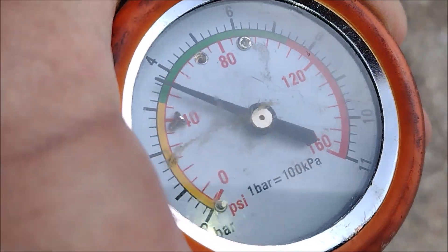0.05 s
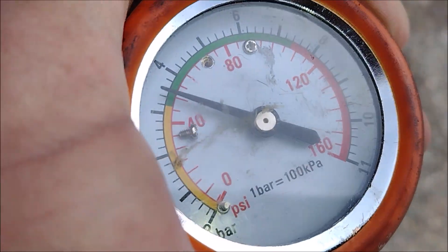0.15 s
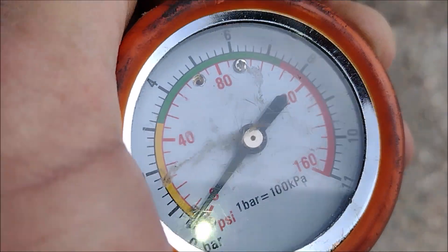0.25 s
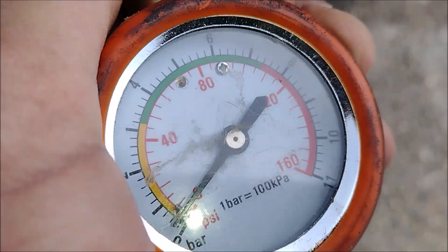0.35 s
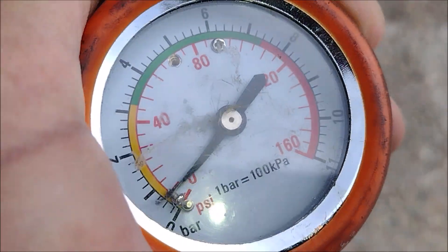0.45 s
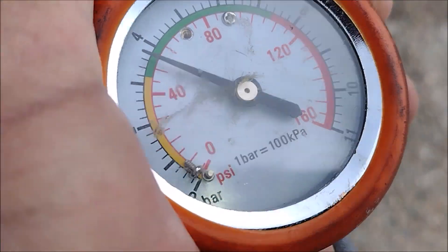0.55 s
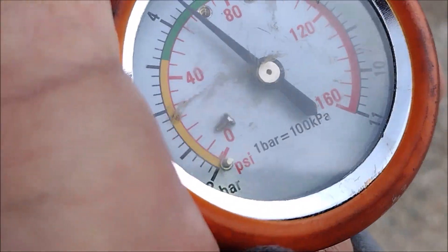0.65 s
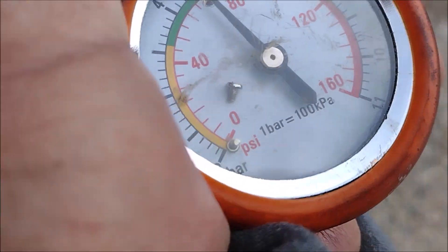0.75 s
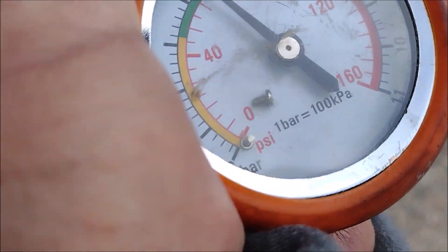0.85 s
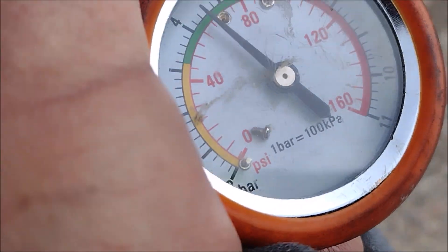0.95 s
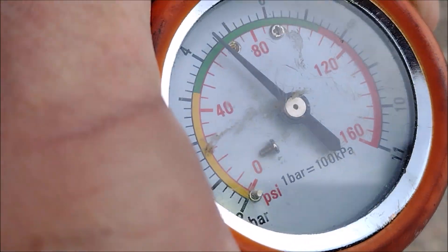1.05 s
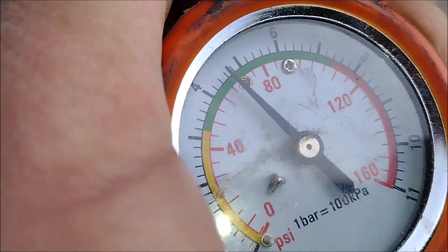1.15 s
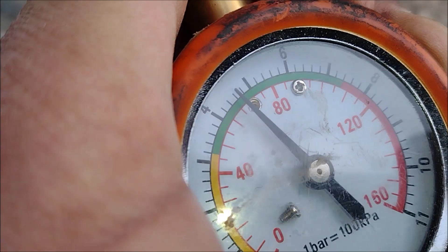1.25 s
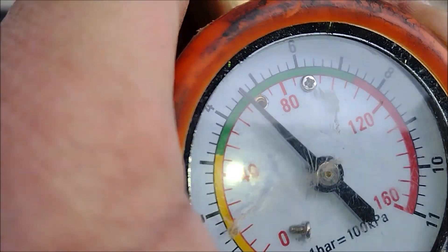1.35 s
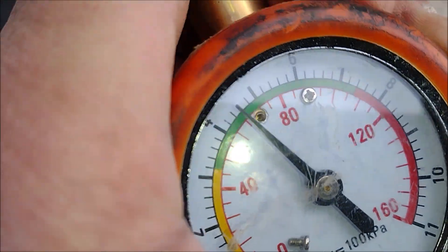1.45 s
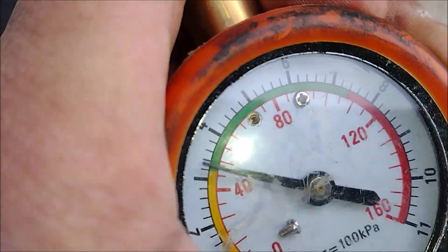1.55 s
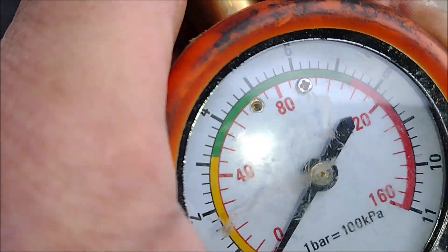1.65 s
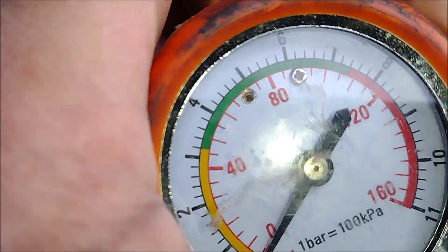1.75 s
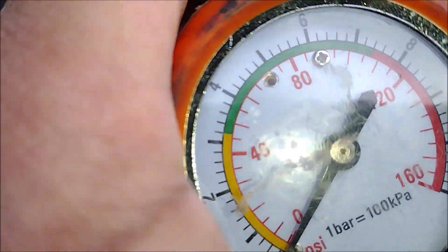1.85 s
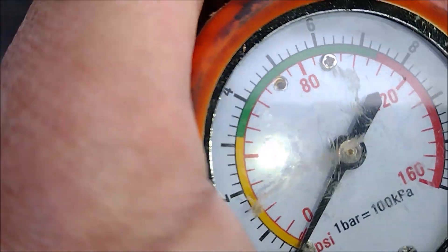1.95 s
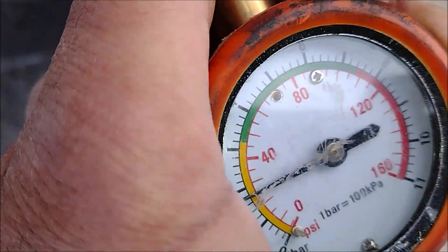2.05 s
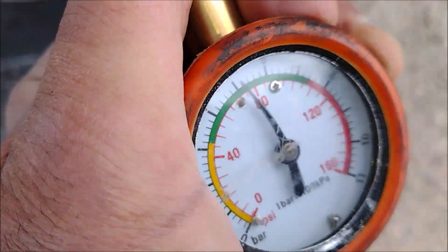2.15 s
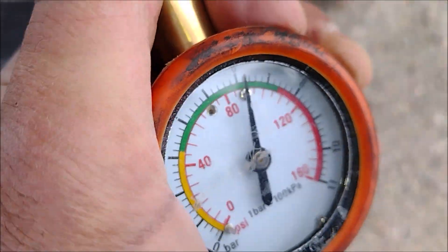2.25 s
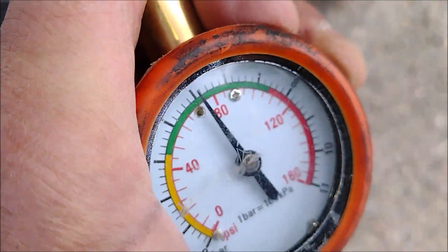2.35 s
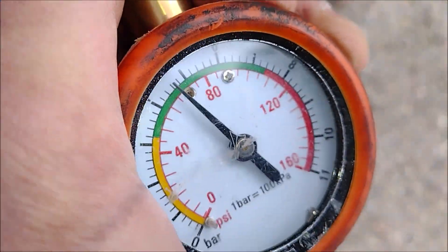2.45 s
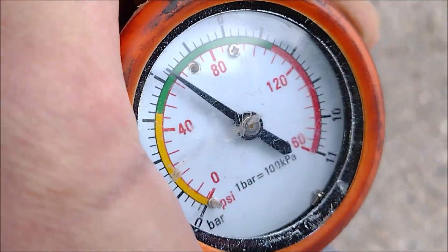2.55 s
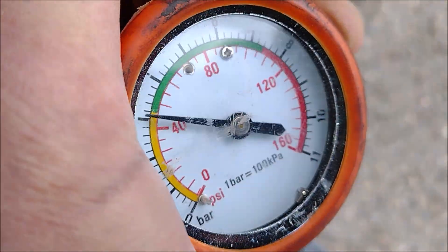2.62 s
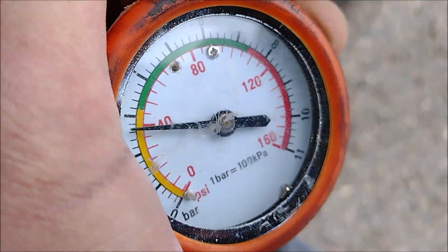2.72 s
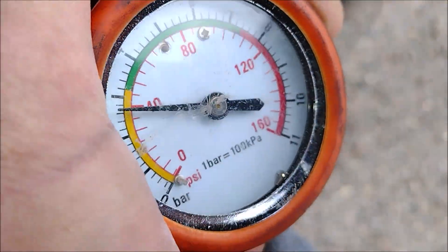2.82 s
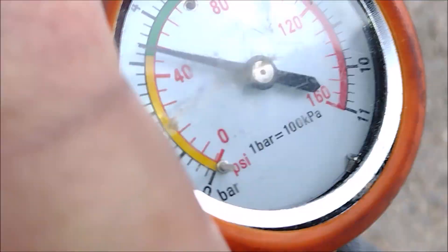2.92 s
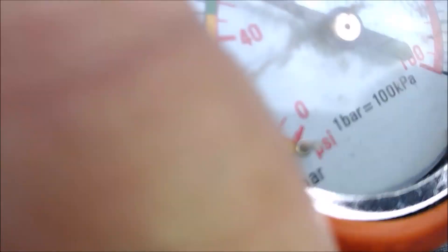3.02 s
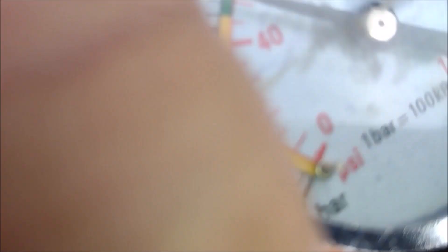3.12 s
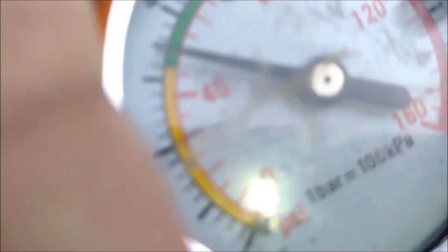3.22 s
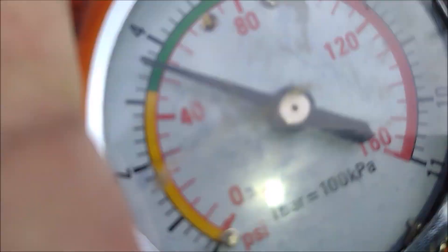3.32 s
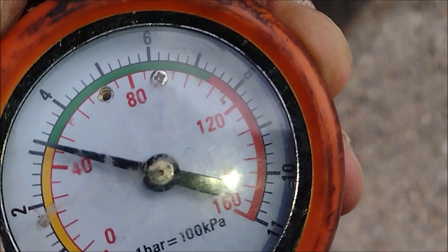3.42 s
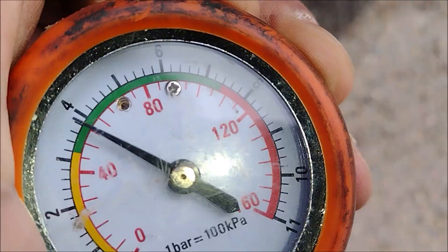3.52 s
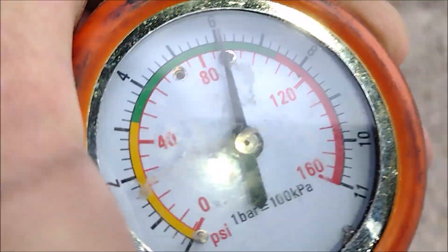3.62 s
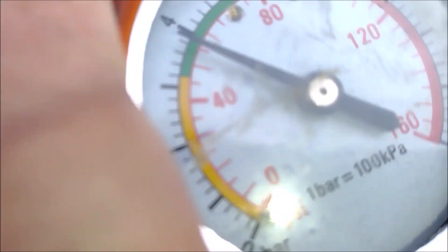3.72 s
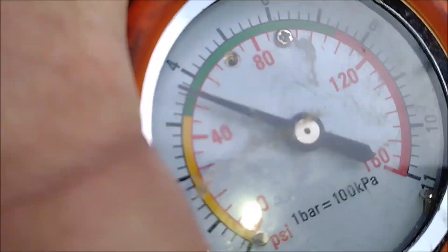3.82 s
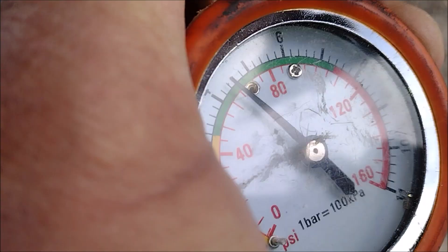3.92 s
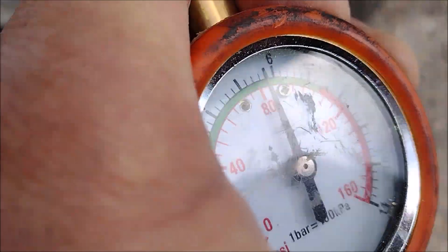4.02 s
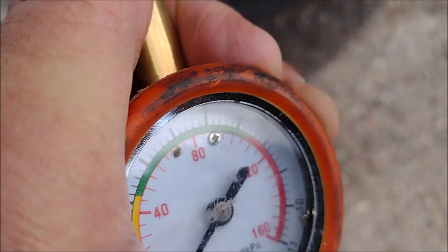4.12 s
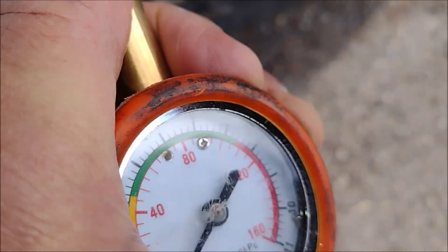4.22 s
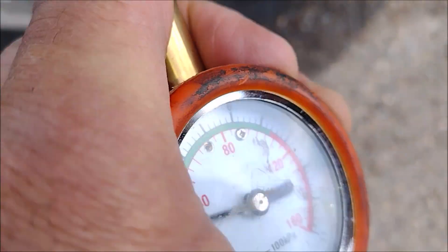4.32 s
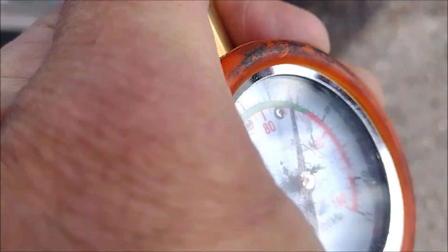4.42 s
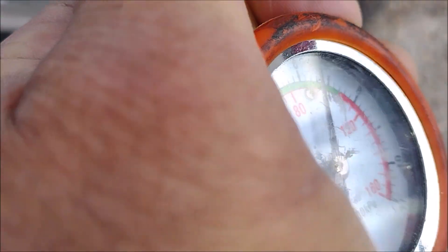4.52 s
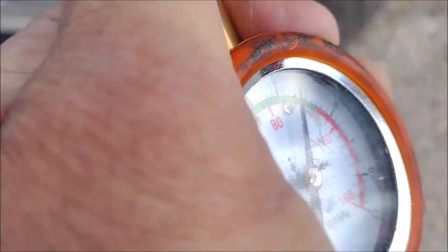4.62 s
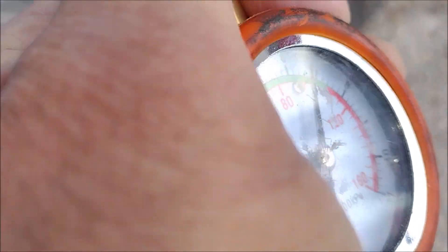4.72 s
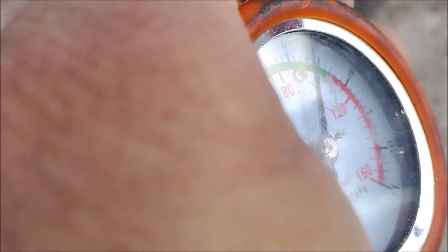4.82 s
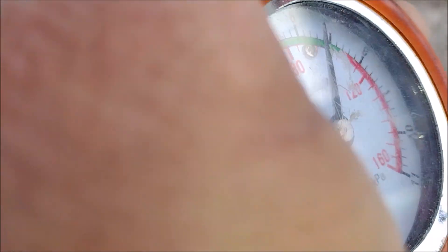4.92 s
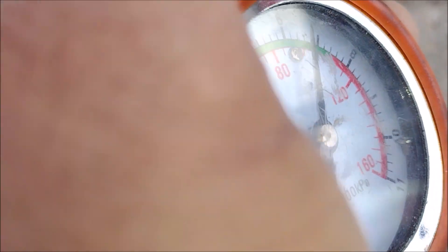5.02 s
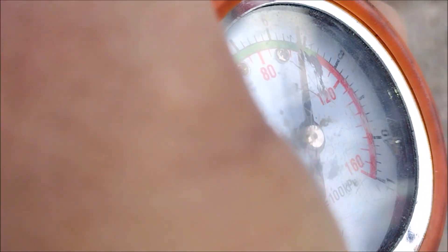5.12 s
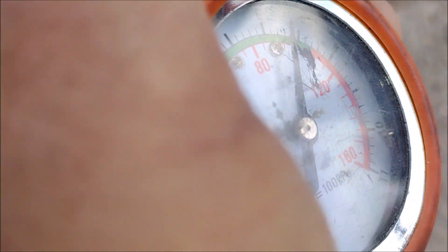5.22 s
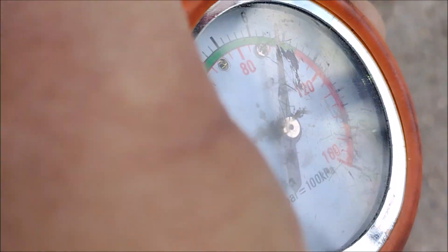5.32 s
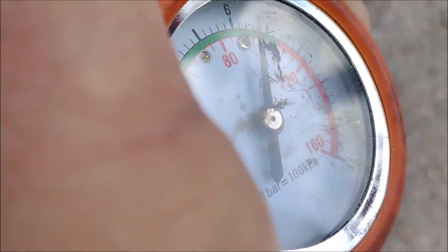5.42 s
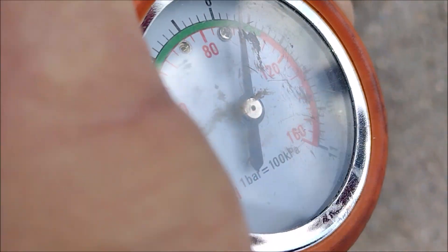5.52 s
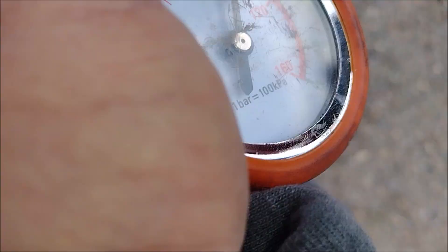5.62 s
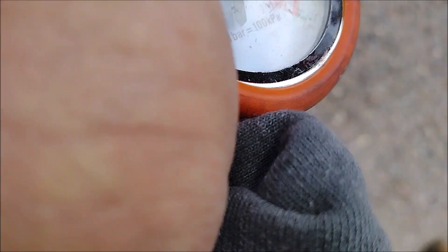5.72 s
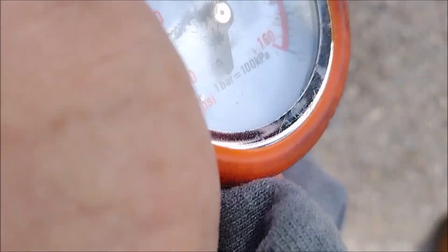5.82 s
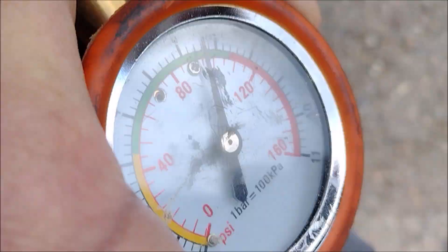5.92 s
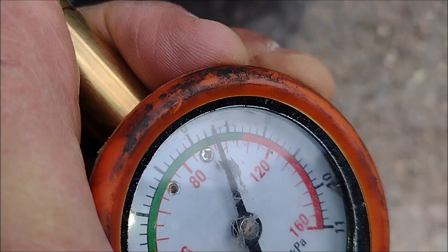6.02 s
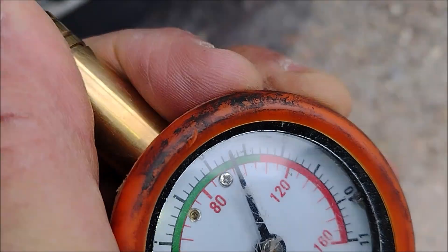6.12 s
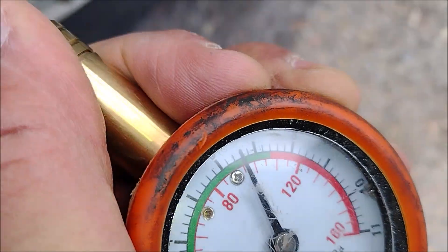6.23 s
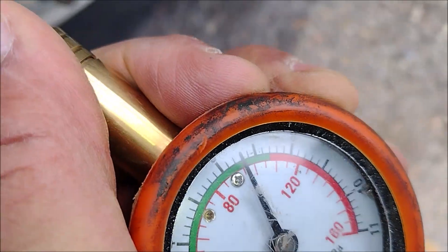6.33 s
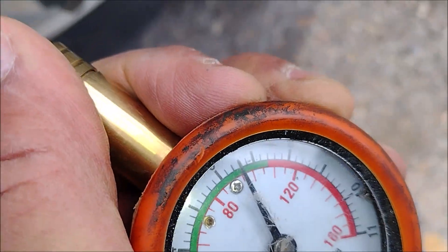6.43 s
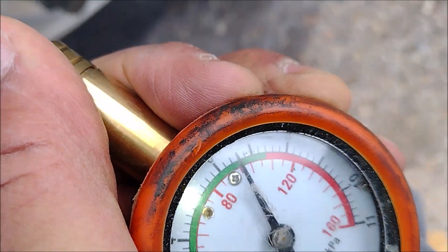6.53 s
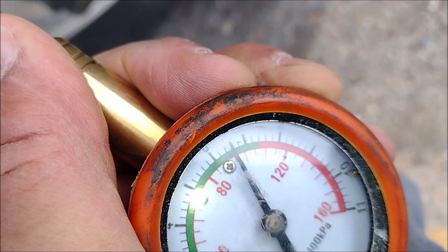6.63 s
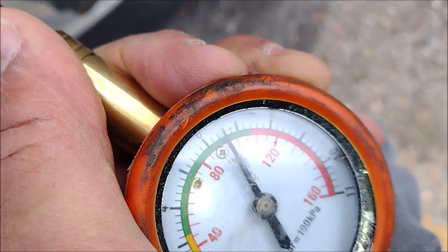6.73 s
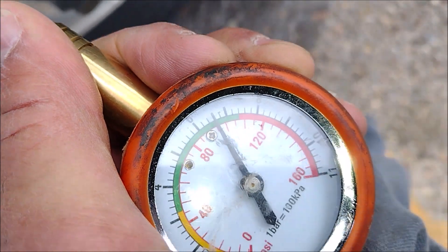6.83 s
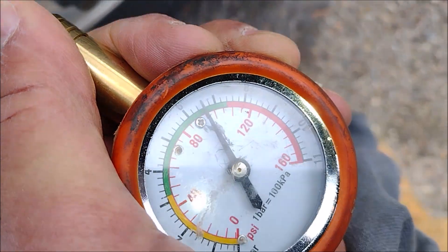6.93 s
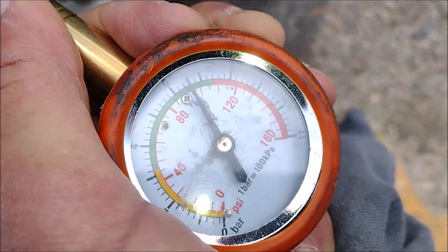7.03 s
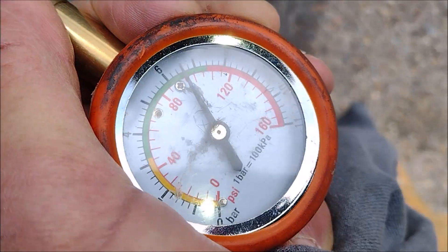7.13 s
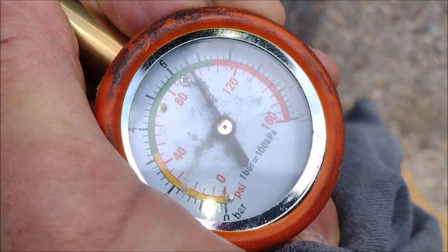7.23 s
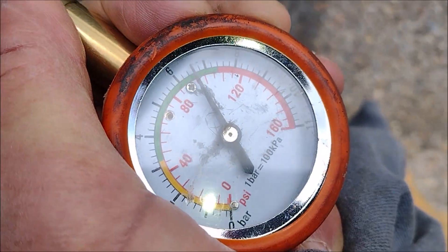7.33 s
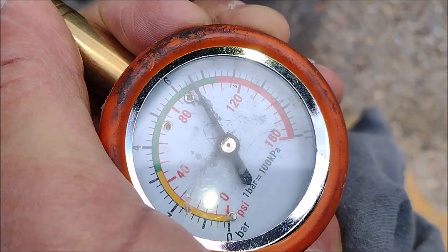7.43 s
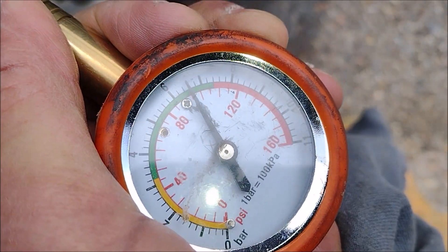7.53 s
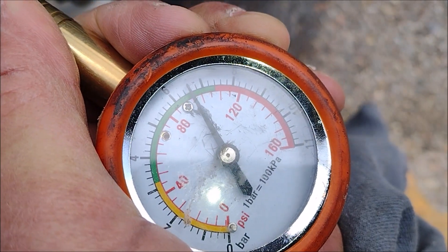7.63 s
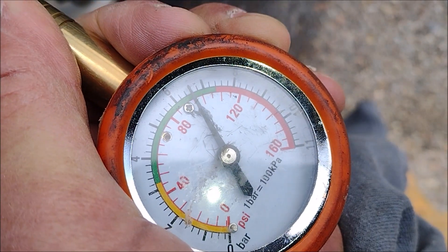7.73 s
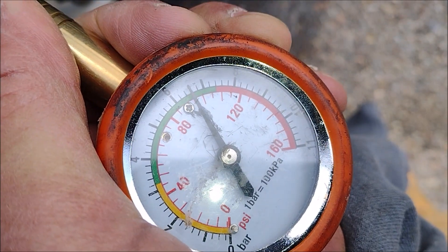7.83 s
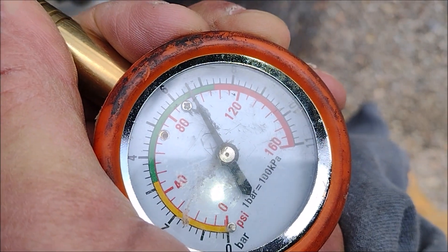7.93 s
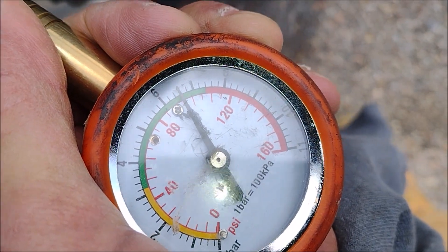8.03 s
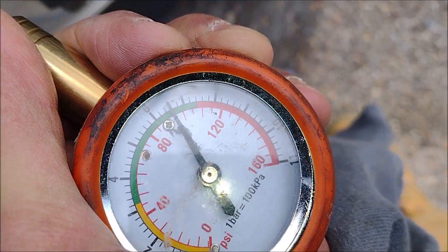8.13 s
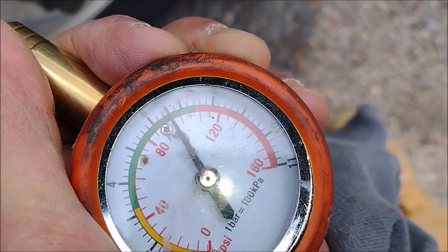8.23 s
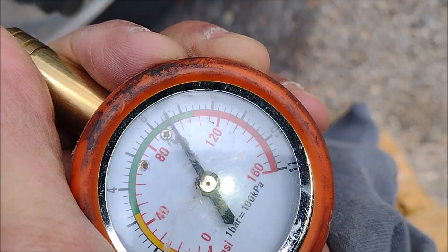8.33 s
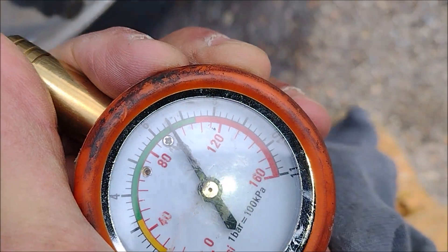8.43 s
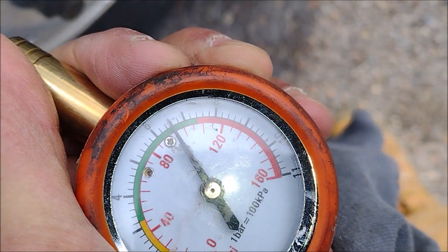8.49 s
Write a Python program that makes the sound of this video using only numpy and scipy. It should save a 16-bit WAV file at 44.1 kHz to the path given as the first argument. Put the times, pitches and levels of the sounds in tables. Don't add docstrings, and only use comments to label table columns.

```python
import sys
import numpy as np
from scipy import signal
from scipy.fft import rfft, irfft, next_fast_len
from scipy.io import wavfile
from scipy.ndimage import uniform_filter1d, map_coordinates

SR = 44100
rng = np.random.default_rng(int(sys.argv[2]) if len(sys.argv) > 2 else 0)


def master_out(mix):
    frames = np.transpose(np.atleast_2d(mix))
    ceiling = np.clip(frames, -1, 1)
    pcm = np.round(ceiling * 32767).astype(np.int16)
    wavfile.write(sys.argv[1], SR, pcm)


def invert_db(x):
    u = np.asarray(x, float) / 20
    return 10 ** u


N = 377496

# opening in seconds, shutting in seconds,
# jet level in dB, growth of the rasp in dB, closing rate in dB per second.
BURSTS = [
    (-0.3, 0.383, -22.5, -6, 1104),
    (0.588, 1.698, -22, 7, 953),
    (2.114, 4.232, -22, 0.5, 800),
    (4.365, 4.481, -23, 6, 902),
]
# start in seconds, length in seconds, flow in dB, gap in dB.
ROCKS = [(-0.1, 0.22, 0.6, 2), (0.15, 0.2, 0.5, -3), (0.677, 0.12, -1, 3), (0.818, 0.092, -1.2, 5),
         (0.986, 0.14, 0, 0), (1.106, 0.25, -1, 3), (1.44, 0.51, -1.5, 3.0), (2.139, 0.031, 0, 5),
         (2.17, 0.07, 3.5, 1), (2.249, 0.068, 0, -13), (2.316, 0.057, 1, -7.5), (2.377, 0.41, 1, 2.0),
         (2.795, 0.32, 1.5, 3.5), (3.15, 0.36, 1, -3.5), (3.61, 0.12, 1.5, 3.5), (3.703, 0.067, -2.5, -2.5),
         (3.778, 0.029, 1, 3), (3.826, 0.13, -1.5, -1.5), (3.978, 0.11, 2.5, 0), (4.067, 0.16, -1, 2),
         (4.208, 0.026, 3, 1.5), (4.406, 0.064, 2.5, 4)]
# frequency in Hz, density in dB per Hz.
BLAST_COLOUR = [(150, -27), (250, -14), (360, -16.5), (517, -3), (855, -8.5), (933, -4), (1460, -8),
                (1770, -8), (2000, -8.5), (2500, -8.5), (2980, -8.5), (5550, -9), (7080, -6), (10000, -12),
                (15700, -7)]
# frequency in Hz, left minus right in dB.
BLAST_BALANCE = [(60, -5.5), (99, -6.5), (160, -5), (270, -6), (450, -1.5), (740, -6.5), (1220, -5.5),
                 (2010, -11), (3330, -1), (5500, -3.5), (9080, 1), (15000, 9.5)]
# frequency in Hz, width in Hz, level in dB.
HOSE_MODES = [(516, 31, 5), (663, 55, 7), (960, 26, 7.5), (1300, 62, 4), (1460, 105, 5.5), (1988, 14, 3),
              (2036, 130, 3), (2810, 130, 2), (3950, 73, -7)]
# delay in ms, left share, right share.
NEAR_ECHOES = [(1.2, 0.12, -0.068), (1.9, 0.13, -0.051), (2.55, 0.17, 0.067), (3.55, -0.1, 0.16),
               (4.3, 0.042, 0.013), (6.1, -0.047, -0.12)]
# time in seconds, hiss level in dB, turn of the hand from 0 to 1.
LEAK_FLOW = [(4.48, -36.5, 0.07), (4.62, -23.5, 0.18), (4.66, -30.5, 0.06), (4.76, -26, 0.18),
             (4.9, -25, 0.31), (5.02, -29, 0.14), (5.66, -34, 0.36), (5.77, -34, 0.41), (5.87, -38, 0.33),
             (6.12, -31.5, 0.59), (6.49, -32, 0.69), (6.71, -35, 0.86), (7.12, -38, 0.83), (7.3, -33.5, 1),
             (7.65, -32.5, 0.99), (8.42, -32, 0.78), (8.56, -30.5, 0.94)]
# frequency in Hz, density in dB per Hz.
LEAK_COLOUR = [(500, -30.5), (1400, -25), (2400, -15.5), (2950, -6), (3550, -18), (4800, -17.5),
               (5900, -11.5), (6500, -2.5), (7300, -3), (8100, -4.5), (8800, -14), (11000, -19),
               (13500, -15.5), (15700, -5.5)]
# frequency in Hz, left minus right in dB.
LEAK_BALANCE = [(500, 19.5), (1500, -7), (2900, 9), (3800, 3.5), (4800, -2.5), (6000, 6.5), (7300, 13.5),
                (8800, 14.5), (10000, 21), (11500, 32), (13000, 37.5), (15500, 19.5)]
# time in seconds, extra path in ms.
GLINT = [(4.5, .945), (5.12, .99), (5.45, .99), (5.95, .95), (6.15, .91), (6.4, .88), (7.0, .87),
         (7.3, .886), (8.56, .888)]
# time in seconds, peak in dB, brightness in dB per octave.
TICKS = [
    (1.773, -42, 7),
    (1.776, -54, 13),
    (1.82, -42, -5.5),
]
# frequency in Hz, level in dB, 60 dB decay time in seconds.
CHUCK_MODES = [(2920, -7, 0.15), (4915, 0.5, 0.098), (5800, 7, 0.028), (7763, -5, .05), (9800, 1, .025),
               (13600, -6, .05)]
# frequency in Hz, likeness from 0 to 1.
LIKENESS = [(200, 0.63), (600, 1), (1500, 0.35), (3000, 0.7), (6000, 0.19), (12000, 0.11)]
# time in seconds, peak in dB, length in seconds.
GUSTS = [(0.033, -38, 0.013), (0.18, -23, .1), (0.368, -27, 0.034), (0.525, -22.5, 0.037),
         (1.996, -31, 0.013), (0.91, -40.5, .08), (1.13, -28, 0.029), (1.24, -31.5, 0.064),
         (1.805, -30.5, 0.071), (1.995, -26, 0.048), (2.084, -23.5, 0.039), (2.154, -22.5, 0.072),
         (2.434, -33, .06), (2.76, -32.5, 0.064), (3.045, -34, 0.076), (3.135, -25, .03),
         (3.213, -29, 0.037), (3.342, -28.5, 0.16), (3.613, -24.5, 0.033), (3.836, -27, 0.033),
         (3.904, -27, 0.037), (4.016, -27.5, 0.052), (4.236, -24.5, 0.063), (4.37, -31, 0.087),
         (5.042, -36.5, 0.046), (6.078, -46.5, 0.16), (0.566, -29.5, .02), (7.847, -47, 0.025),
         (7.93, -39, 0.021), (8.1, -47, 0.045)]
# time in seconds, change in dB, length in seconds.
LULLS = [
    (0.083, -19, 0.04),
    (0.446, 3, 0.03),
    (2.33, -4, 0.044),
    (3.718, -4, 0.041),
    (4.5, -4, 0.028),
]
# frequency in Hz, density in dB per Hz.
BUFFET_COLOUR = [(15, -53), (25, -38), (84, 0), (118, 0.5), (266, -11), (328, -18), (362, -20),
                 (750, -34.5), (1000, -39), (1200, -61), (1560, -75), (2640, -120)]
# frequency in Hz, density in dB per Hz.
YARD_COLOUR = [(15, -62), (25, -35), (48, -28), (59, -5), (81, -0.5), (157, 0.5), (298, -12), (429, -18.5),
               (482, -16), (1300, -27.5), (1690, -55), (2860, -120)]

CREEP_DB, CREEP_DB_PER_S, CREEP_THIN_DB = -43.5, 700, -1
OPEN_S, OPEN_POWER = 0.0083, 2.2
BUILD_DB, BUILD_S = -5.5, 0.064
SQUEEZE_DB, SQUEEZE_S = 2.5, 0.056
POP_DB, POP_S = 9.0, 0.03
PAUSE_DB, PAUSE_ROAR_DB, PAUSE_FADE_DB_PER_S = -69, 18.5, 15
ROCK_EDGE_S = 0.0092
ROAR_DB, RASP_DB, TOP_DB = -4.5, -5.5, -7.5
RASP_PER_GAP, TOP_PER_FLOW = 0.39, -1.18
SEALED_JET_DB, SEALED_GAP_DB = -27, -16
BOOM_FOLLOWS = 0.83
LOOSE_LEAD_MS = 0.2783

WHISTLE_DB, SIZZLE_DB, AIR_DB = (-7, -18), (4.5, -11), (-8, -7)
SHADE_DB, LEAD_MS = (5, 25.5), (0.21, 0.36)
WHISTLE_HZ, WHISTLE_OCTAVES, WHISTLE_STANDS_DB = 2800, 0.14, 8
COVER_S, COVER_WIDTH_S, COVER_DB = 5.7, 0.58, -10.5
GLINT_SHARE = 0.38
TYRE_HUM_HZ, TYRE_HUM_WIDTH_HZ, TYRE_HUM_DB = 610, 73, (3, 15)

GUST_FALL_DB = 5.5
DRAUGHT_DB, YARD_DB = -43.0, -43


def blast():
    def bend(hz, t):
        _, roar_db, rasp_db, top_db = chuck(t)
        over_roar = share_of(hz, 1440, 3950)
        follows = BOOM_FOLLOWS + (1 - BOOM_FOLLOWS) * share_of(hz, 630, 1100)
        under_jet = (roar_db + 0.5) * follows * (1 - over_roar) + (rasp_db + 5) * over_roar
        return under_jet * (1 - share_of(hz, 3650, 5300)) + (top_db + 1) * share_of(hz, 8000, 9080)

    air = turbulence(BLAST_COLOUR, BLAST_BALANCE, (4500, 8300), bend,
                     gust_db=-0.11, patch_db=1.2, streak_db=1.83)
    rung = air.copy()
    for hz, width_hz, db in HOSE_MODES:
        rung += (invert_db(db) - 1) * resonance(air, hz, width_hz)

    t = np.arange(N) / SR
    jet_db = np.interp(t, t[::32], chuck(t[::32])[0])
    sealing_db = -90 * np.clip((t - 4.52) / 1.1, 0, 1)
    rung = rung * invert_db(jet_db + sealing_db - 1.0)

    near = rung + invert_db(-4) * resonance(rung, 2940, 8.4)
    for ms, *shares in NEAR_ECHOES:
        lag = round(ms * SR / 1000)
        near[:, lag:] += np.array(shares)[:, None] * rung[:, :-lag]
    return near


def chuck(t):
    jet_db, roar_db, rasp_db = 0 * t - 120, 0 * t, 0 * t
    for start, stop, db, grow_db, shut_db in BURSTS:
        age, left = np.maximum(t - start, 0), stop - t
        level_db = db + (CREEP_DB - db) * np.exp(-(age / OPEN_S) ** OPEN_POWER)
        level_db = level_db + CREEP_DB_PER_S * np.minimum(t - start, 0)
        level_db = level_db + BUILD_DB * np.exp(-age / BUILD_S)
        level_db = level_db + SQUEEZE_DB * np.exp(-np.abs(left) / SQUEEZE_S)
        level_db = level_db + shut_db * np.minimum(left, 0)
        residue_db = np.where(left < 0, PAUSE_DB + PAUSE_FADE_DB_PER_S * left, -120)
        jet_db = np.maximum.reduce([jet_db, level_db, residue_db])
        thin_db = CREEP_THIN_DB * ((age == 0) & (t > start - 0.025))
        on = (age > 0) & (left > -0.05)
        roar_db = roar_db + thin_db + on * POP_DB * np.exp(-age / POP_S)
        rasp_db = rasp_db + thin_db + on * grow_db * (age / (stop - start) - .5)

    flow_db, gap_db = 0 * t, 0 * t
    for s, length, db, wide_db in ROCKS:
        held = np.clip(np.minimum(t - s, s + length - t) / ROCK_EDGE_S + .5, 0, 1)
        flow_db = flow_db + db * held
        gap_db = gap_db + wide_db * held

    sealed = np.clip((t - BURSTS[-1][1]) / 0.053, 0, 1)
    jet_db = np.where(sealed > 0, np.maximum(jet_db, SEALED_JET_DB), jet_db)
    gap_db = gap_db + SEALED_GAP_DB * sealed
    paused = np.clip((-48.5 - jet_db) / 15, 0, 1)
    swing_db = (flow_db + np.maximum(jet_db, -28) + 23) * (1 - paused)
    roar_db = ROAR_DB + roar_db + gap_db + PAUSE_ROAR_DB * paused
    rasp_db = RASP_DB + rasp_db + RASP_PER_GAP * gap_db * (1 - sealed) + flow_db + 7 * paused
    top_db = TOP_DB + TOP_PER_FLOW * swing_db + 3 * paused
    return jet_db + flow_db, roar_db, rasp_db, top_db


def leak():
    def bend(hz, t):
        turn = in_time(LEAK_FLOW, t)[1]
        cover_db = COVER_DB * np.exp(-((t - COVER_S) / COVER_WIDTH_S) ** 2)
        whistle_db = turned(WHISTLE_DB, turn)
        sizzle_db = turned(SIZZLE_DB, turn) + 0.18 * cover_db
        top_db = turned(AIR_DB, turn) + cover_db
        deeper = 1 + 0.57 * share_of(hz, 3800, 2900)
        low = (whistle_db + 12.5) * (1 - share_of(hz, 5830, 5857)) * deeper
        peak = np.exp(-(np.log2(hz / WHISTLE_HZ) / WHISTLE_OCTAVES) ** 2)
        low = low + WHISTLE_STANDS_DB * (turn - .5) * peak
        upper = share_of(hz, 10950, 13400)
        high = (sizzle_db + 5.5) * (1 - upper) + (top_db + 4) * upper
        high = high * share_of(hz, 7760, 9150)
        shaded = 0.12 * low + 0.28 * high - 0.25 * cover_db * upper
        return np.array([low + high, shaded])

    left, right = turbulence(LEAK_COLOUR, LEAK_BALANCE, (6000, 8500), bend,
                             gust_db=.5, patch_db=0.4, streak_db=1.0)
    t = np.arange(N) / SR
    hiss_db, turn = in_time(LEAK_FLOW, t)
    path_ms, = in_time(GLINT, t)
    left = left + GLINT_SHARE * late(left, path_ms) + 0.037 * late(left, 1.3)
    right = right + 0.13 * late(right, 1.86) + 0.024 * late(right, 1.56)
    left = left + invert_db(TYRE_HUM_DB[0]) * resonance(left, TYRE_HUM_HZ, TYRE_HUM_WIDTH_HZ)
    right = right + invert_db(TYRE_HUM_DB[1]) * resonance(right, TYRE_HUM_HZ, TYRE_HUM_WIDTH_HZ)
    right = right * invert_db(16.0 - turned(SHADE_DB, turn))
    return np.array([left, right]) * invert_db(hiss_db - 2.5) * np.clip((t - 4.46) / 0.081, 0, 1)


def ticks():
    out = np.zeros(N)
    for hz, db, t60 in CHUCK_MODES:
        clicks = np.full(N, 1e-18)
        for s, peak_db, tilt_db in TICKS:
            clicks[round(s * SR)] = invert_db(peak_db + db - 6.5 + tilt_db * np.log2(hz / 10000))
        r, w = invert_db(-60 / (t60 * SR)), 2 * np.pi * hz / SR
        out += signal.lfilter([0, np.sin(w)], [1, -2 * r * np.cos(w), r * r], clicks)
    return out


def buffet():
    lumps = np.repeat(patches((1, N // 64 + 1), across=1, along=12)[0], 64)[:N]
    coarse = np.arange(0, N + 64, 64) / SR
    level = np.interp(np.arange(N) / SR, coarse, gusts(coarse))
    port_db = np.array([[-2.5], [2.5]])
    return slow_noise(BUFFET_COLOUR, likeness=0.24) * level * invert_db(-3.0 + 3.24 * lumps + port_db)


def gusts(t):
    hiss_db = in_time(LEAK_FLOW, np.maximum(t, 4.9))[0]
    power = invert_db(DRAUGHT_DB + hiss_db + 26.5) ** 2
    for s, db, length in GUSTS:
        power = power + invert_db(db - GUST_FALL_DB * ((t - s) / length) ** 2) ** 2
    lull_db = sum(db * np.exp(-((t - s) / length) ** 2) for s, db, length in LULLS)
    return np.sqrt(power) * invert_db(lull_db)


def yard():
    return invert_db(YARD_DB - 5.5) * slow_noise(YARD_COLOUR, likeness=0.76)


def turbulence(colour, balance, level_band, moving_db, gust_db, patch_db, streak_db):
    hz, t, (common, left, right) = signal.stft(rng.standard_normal((3, N)), SR, nperseg=512)
    hz = np.maximum(hz, 10)[:, None]
    pair = two_ports(common, left, right, at_hz(LIKENESS, hz))
    still = invert_db(at_hz(colour, hz) + np.multiply.outer([.5, -.5], at_hz(balance, hz)))
    inside = (hz > level_band[0]) & (hz < level_band[1])
    still = still / np.sqrt(np.mean(inside * still ** 2) * .5)
    flicker = gust_db * patches((1, len(t)), across=1, along=5)
    flicker = flicker + patch_db * patches(common.shape, across=14, along=8)
    streaks = [patches(common.shape, across=2, along=60) for port in range(2)]
    flicker = flicker + streak_db * np.array(streaks)
    return signal.istft(pair * still * invert_db(moving_db(hz, t) + flicker), SR, nperseg=512)[1][:, :N]


def slow_noise(colour, likeness):
    pair = two_ports(*rng.standard_normal((3, N)), likeness)
    size = next_fast_len(N)
    hz = np.maximum(np.arange(size // 2 + 1) * SR / size, 10)
    out = irfft(rfft(pair, size) * invert_db(at_hz(colour, hz)), size)[:, :N]
    return out / np.sqrt(np.mean(out.mean(axis=0) ** 2))


def two_ports(common, left, right, likeness):
    share = np.clip(likeness, 0, 1)
    return np.sqrt(share) * common + np.sqrt(1 - share) * np.array([left, right])


def patches(shape, across, along):
    field = rng.standard_normal(shape)
    for _ in range(2):
        field = uniform_filter1d(field, size=across, axis=0)
        field = uniform_filter1d(field, size=along, axis=1)
    return field / field.std()


def resonance(x, hz, width_hz):
    r = np.exp(-np.pi * width_hz / SR)
    poles = [1, -2 * r * np.cos(2 * np.pi * hz / SR), r * r]
    return signal.lfilter([(1 - r * r) / 2, 0, (r * r - 1) / 2], poles, x)


def late(x, ms):
    return map_coordinates(x, [np.arange(N) - ms * SR / 1000], order=3, mode="nearest")


def at_hz(points, hz):
    table_hz, value = np.transpose(points)
    return np.interp(np.log(hz), np.log(table_hz), value)


def in_time(rows, t):
    s, *columns = np.transpose(rows)
    return [np.interp(t, s, c) for c in columns]


def share_of(hz, low_hz, high_hz):
    return np.clip(np.log(hz / low_hz) / np.log(high_hz / low_hz), 0, 1)


def turned(ends, turn):
    return ends[0] + (ends[1] - ends[0]) * turn


def scene():
    left, right = blast() + leak() + ticks()
    t = np.arange(N) / SR
    sealed_lead_ms = turned(LEAD_MS, in_time(LEAK_FLOW, t)[1])
    lead_ms = np.where(t < 4.5, LOOSE_LEAD_MS, sealed_lead_ms)
    jets = np.array([left, late(right, lead_ms)])
    return jets + buffet() + yard()


def band_limit(x):
    return signal.sosfilt(signal.butter(12, 16320, fs=SR, output="sos"), x)


def record(dry):
    rounded = 1.257 * np.tanh(dry / 1.145)
    steep = signal.ellip(12, .5, 70, 15780, fs=SR, output="sos")
    return band_limit(signal.sosfilt(steep, rounded))


dry = scene()
out = record(dry)
master_out(out)
```